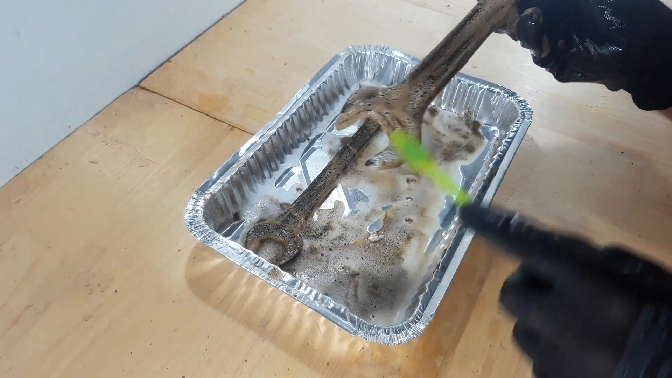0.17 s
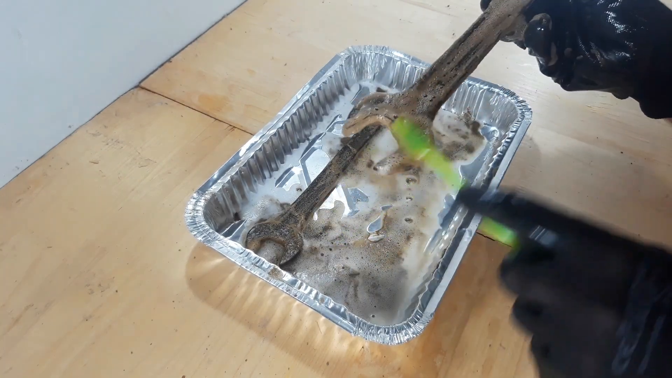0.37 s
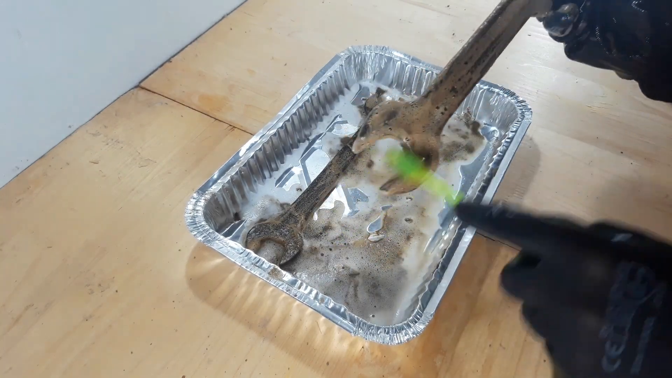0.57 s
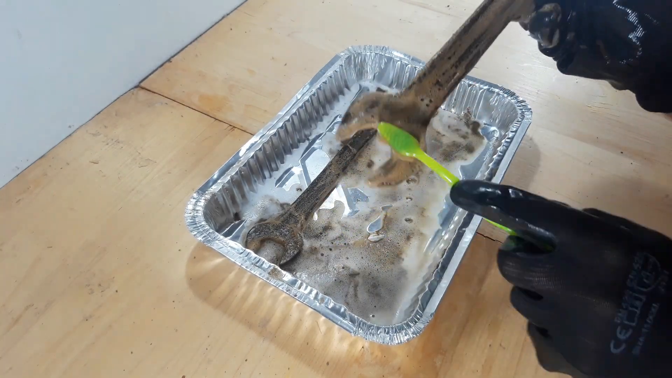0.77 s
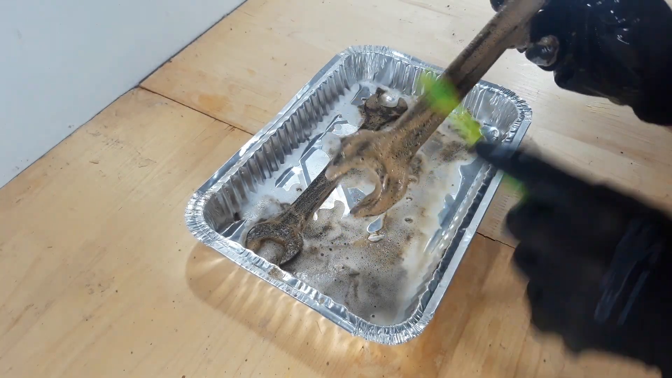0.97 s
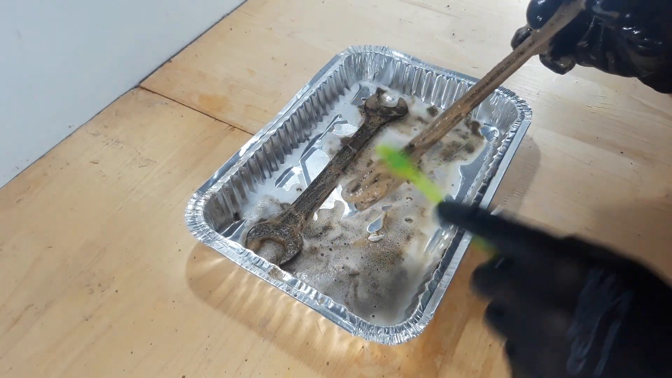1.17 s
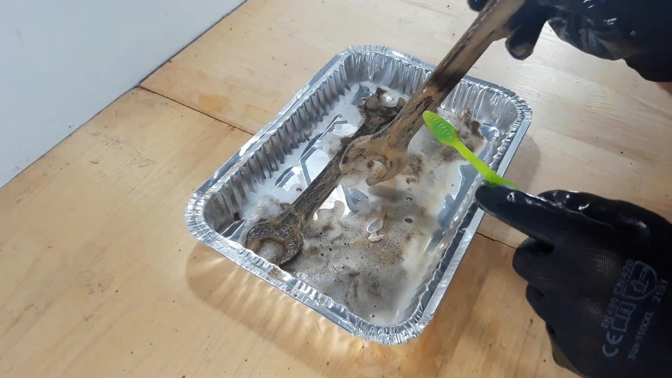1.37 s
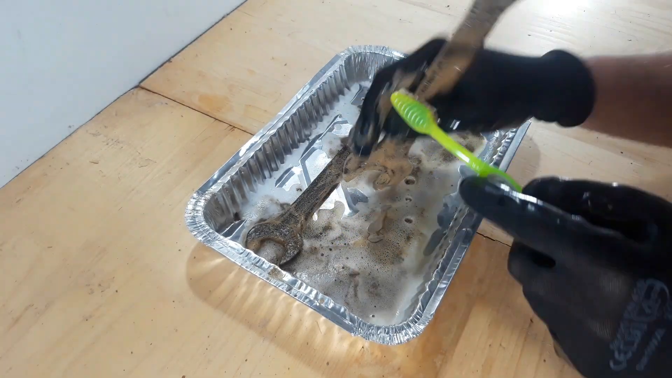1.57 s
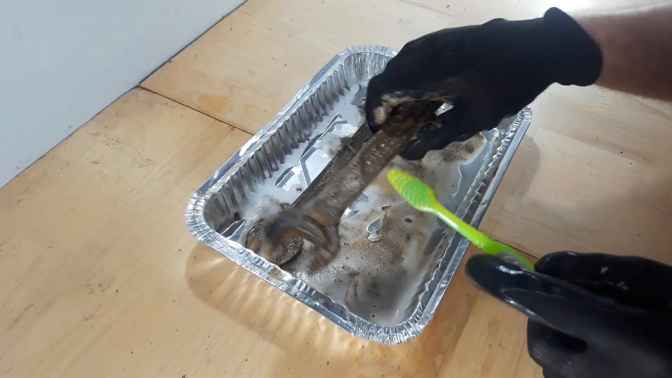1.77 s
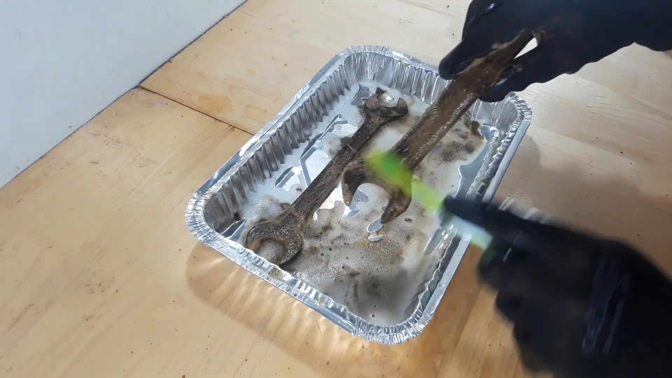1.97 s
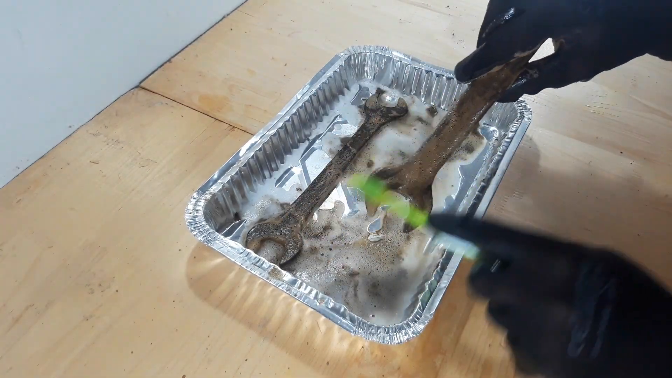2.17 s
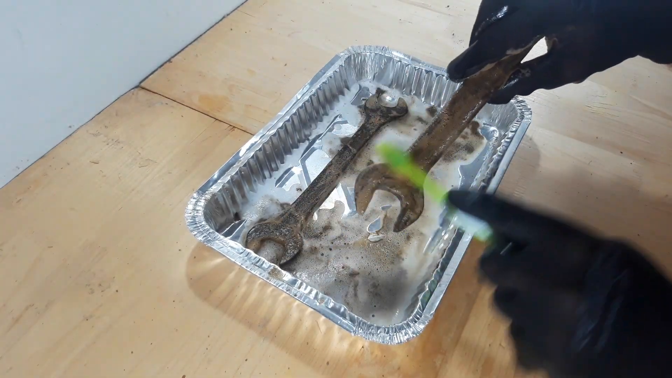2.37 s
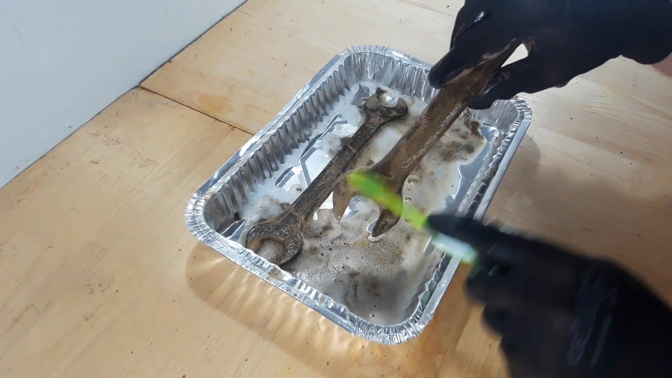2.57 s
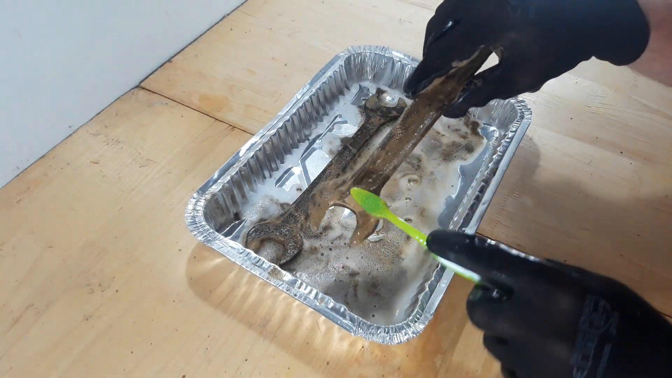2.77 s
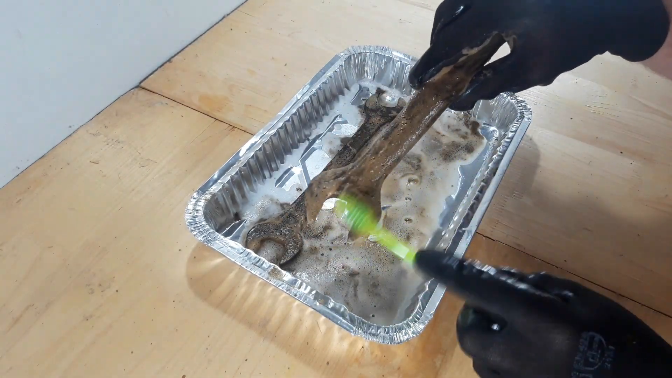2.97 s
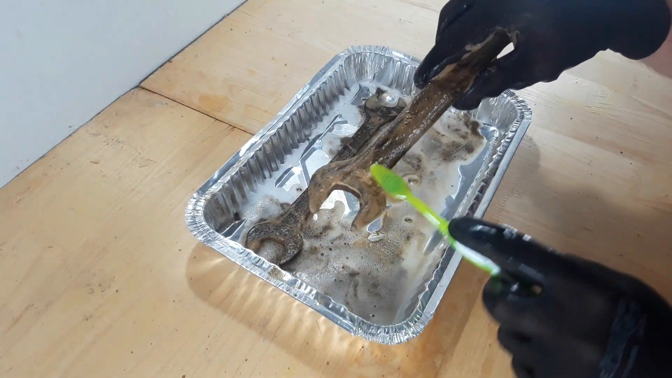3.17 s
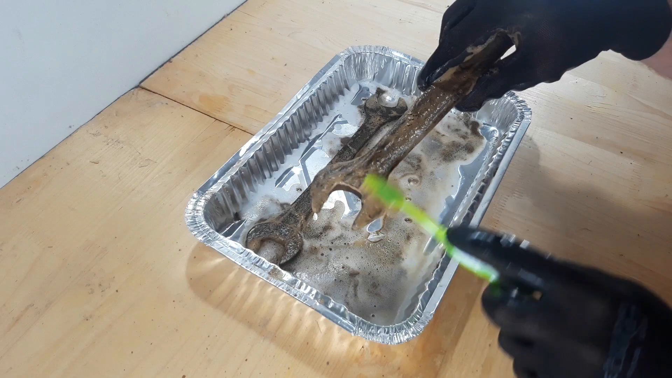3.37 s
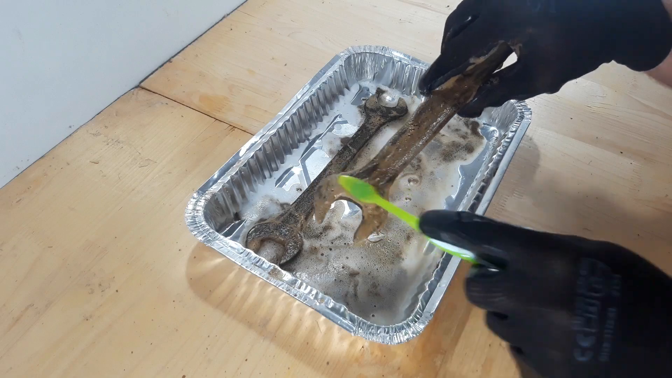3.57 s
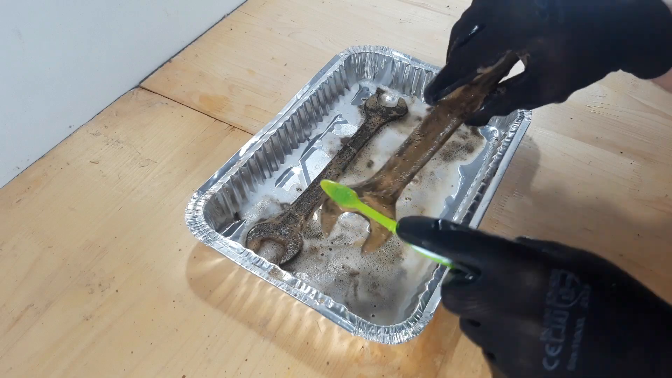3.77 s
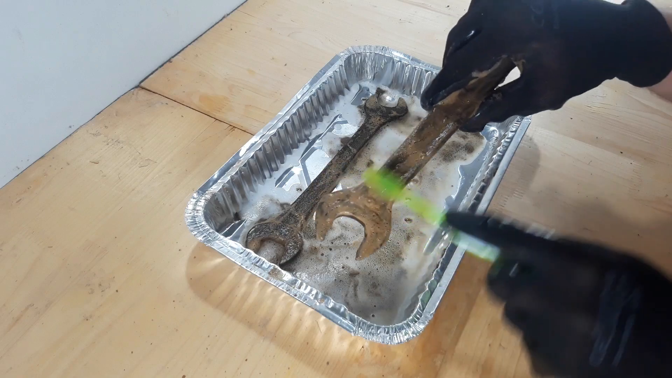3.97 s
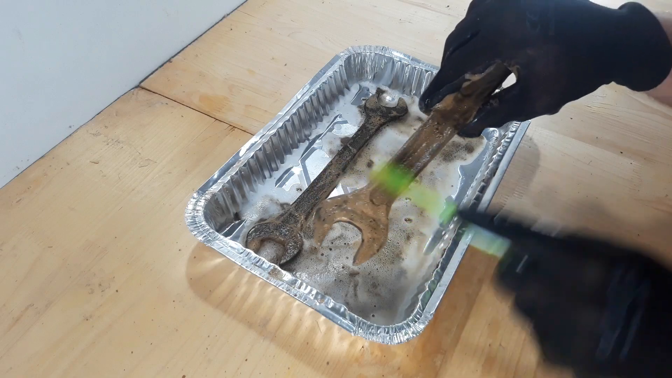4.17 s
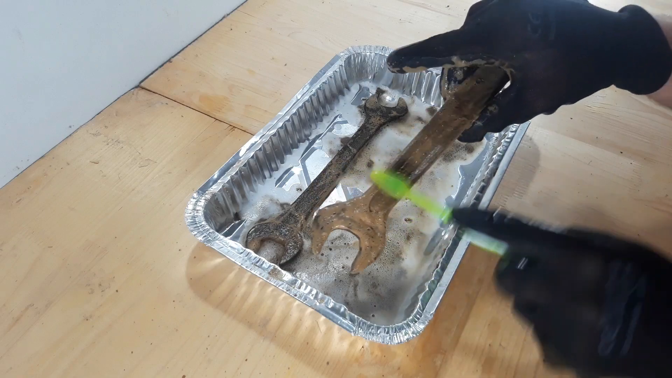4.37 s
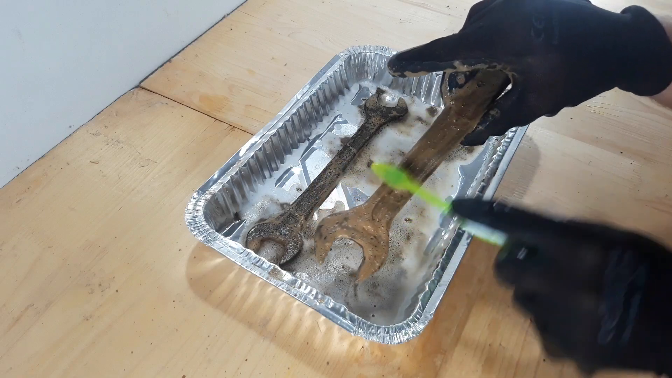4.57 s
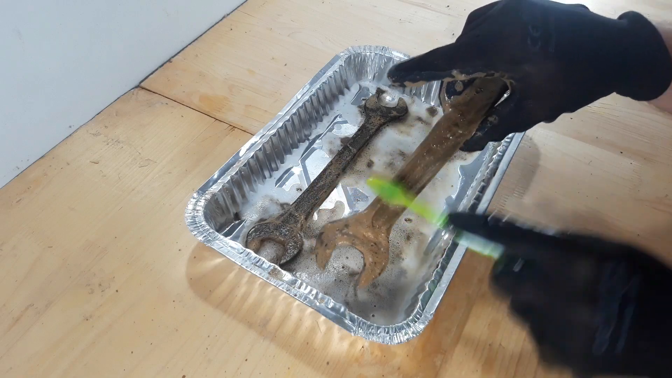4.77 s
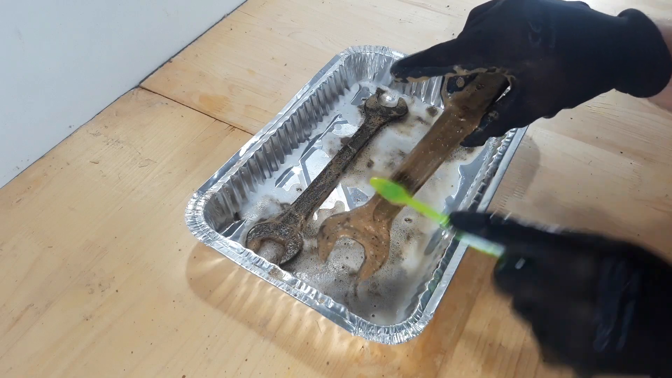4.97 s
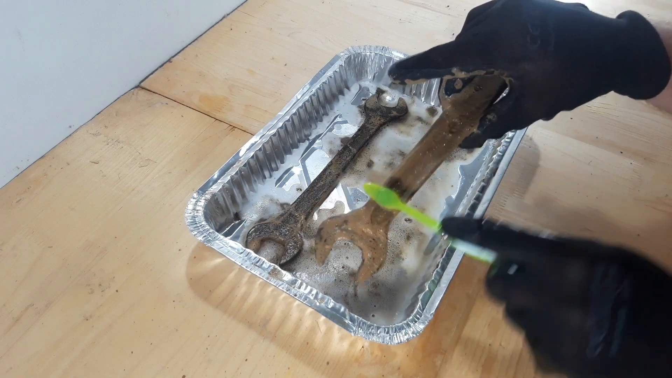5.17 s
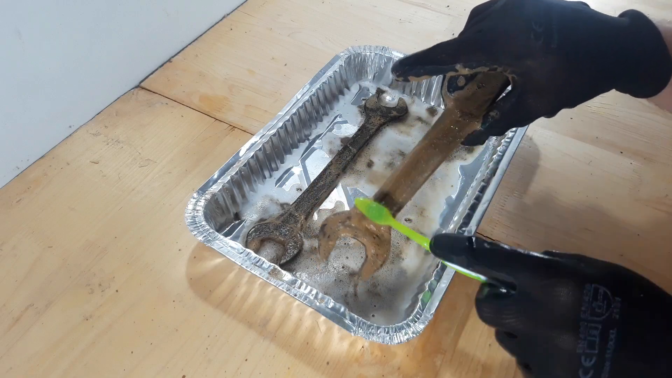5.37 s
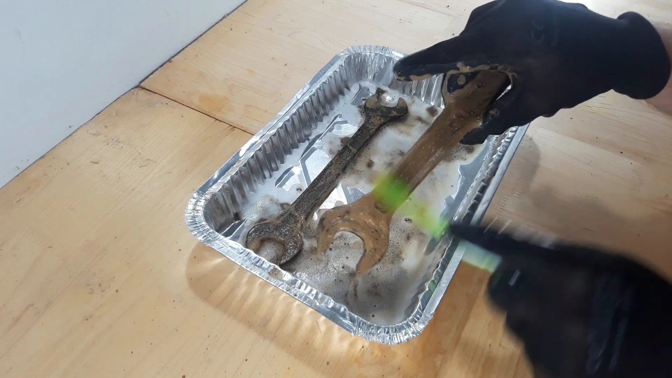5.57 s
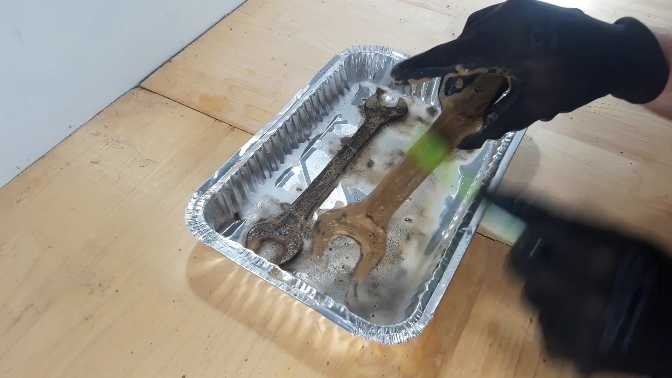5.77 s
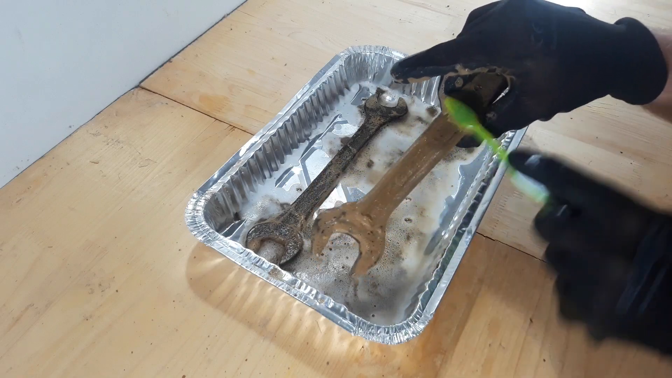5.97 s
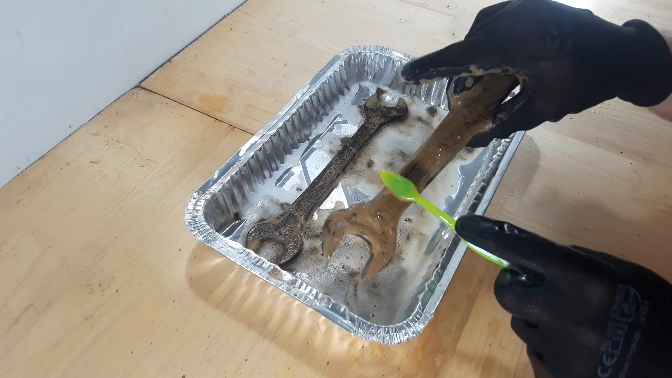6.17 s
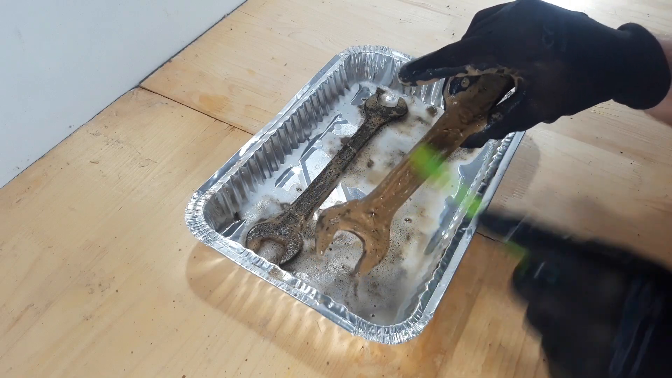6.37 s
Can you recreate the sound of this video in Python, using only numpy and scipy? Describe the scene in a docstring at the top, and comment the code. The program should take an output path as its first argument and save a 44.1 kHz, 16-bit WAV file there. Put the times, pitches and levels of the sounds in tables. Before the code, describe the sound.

Close up in a quiet, dry room, a toothbrush scrapes a rusty wrench in a foil tray of foamy liquid. Short uneven strokes, hissy and hollow, come with soft wet drag between them. Sharp steel ticks and small scrapes sound as the wrench is shifted. Then brisk, regular back-and-forth scrubbing takes over and grows louder, alternating dull and sharp strokes until the end.

```python
"""A toothbrush scrubs a rusty steel wrench in a foil tray of foamy liquid on a wooden bench, close by.
At first mostly single strokes, each a shower of bristle flicks: a wet hiss and a hollow rasp.
Meanwhile the wrench is shifted at about 0.1, 1.5 and 2.8 s, when slips and blows excite steel and foil.
From 3.6 s come brisk to-and-fro scrubs, a dull pull and a sharp push, with a few more single strokes.
Filtered noise and a wavering low tone make a quiet room underneath throughout."""
import sys
import numpy as np
from scipy import signal
from scipy.fft import rfft, irfft
from scipy.io import wavfile
from scipy.ndimage import uniform_filter1d, map_coordinates

SR = 44100
rng = np.random.default_rng(int(sys.argv[2]) if len(sys.argv) > 2 else 0)


def file_out(sig):
    """Save sig as 16-bit WAV at sys.argv[1]."""
    # one column per channel
    cols = np.atleast_2d(sig).T
    # limit, then scale
    lim = np.clip(cols, -1, 1)
    pcm = np.round(lim * 32767).astype(np.int16)
    wavfile.write(sys.argv[1], SR, pcm)


N = 283551
TIME = np.arange(N) / SR  # s
FREQS = np.fft.rfftfreq(4096, 1 / SR)  # Hz, the grid on which filters are drawn


# Spectral shape of bristle hiss and of steel ticks: (frequency [Hz], relative level [dB])
HISS_SPECTRUM = [(200, -44), (800, -32.5), (1300, -27.5), (2300, -10), (2900, -9.5), (3500, -5),
                 (5200, -2.5), (6500, -0.5), (7500, -0.5), (8600, -8.5), (9900, -23.5), (11400, -20),
                 (15800, -23.5)]
RASP_DB, RASP_DB_PER_EDGE = -11, -4.5  # hollow rasp relative to the hiss
SHARP_DB, SHARP_DB_PER_EDGE = 1.86, 2.5  # tilt of upper hiss over lower hiss
RASP_PER_HISS, USUAL_HISS_DB = 0.1, -36  # a hard stroke gains more rasp than hiss (dB per dB)


def brush():
    """Stick-slip: bristles snapping over rust hiss, and whole tufts excite the hollow resonances."""
    start, end, hiss_db, edge = strokes()
    rasp_db = RASP_DB + RASP_DB_PER_EDGE * edge + RASP_PER_HISS * (hiss_db - USUAL_HISS_DB)
    sharp_db = SHARP_DB + SHARP_DB_PER_EDGE * edge
    drag = dragging()

    # a sharp stroke lifts the upper hiss and thins the lower
    upper_stroke = contact(start, end, hiss_db + sharp_db / 3, rise=0.0059, fall=0.0011)
    lower_stroke = contact(start, end, hiss_db - 2 * sharp_db / 3, rise=0.0059, fall=0.0011)
    bristles = flicks(per_s=8000, spread_db=1.0, clump_db=1, clump_hz=170)
    grain = colour(bristles, spectrum(HISS_SPECTRUM))
    high_pass = 1 / (1 + (5400 / (np.fft.rfftfreq(N, 1 / SR) + 1)) ** 8)
    treble = irfft(rfft(grain) * high_pass, N)
    hiss = treble * np.maximum(upper_stroke, drag)
    hiss = hiss + (grain - treble) * np.maximum(lower_stroke, drag)

    # whole tufts slip less often than single bristles and sound the hollow body
    tuft_slips = flicks(per_s=2600, spread_db=1.5, clump_db=2, clump_hz=117)
    tufts = unit(0.3 * bristles + tuft_slips)
    rasp_stroke = contact(start, end, hiss_db + rasp_db, rise=0.0084, fall=0.0018)
    rasp = np.maximum(rasp_stroke, drag * amp(-12.5))
    # pressure grows from 0 to 1 as the rasp rises from -54 to -41 dB, and reaches deeper resonances
    pressure = np.clip((20 * np.log10(rasp + 1e-9) + 54) / 13, 0, 1)
    light_body = colour(tufts * rasp * (1 - pressure), hollow(low_hz=1030))
    firm_body = colour(tufts * rasp * pressure, hollow(low_hz=1005))

    rubbing = amp(0.93) * hiss + light_body + firm_body
    return shimmer(rubbing, patchy_db=2.0, patch_s=.03, patch_hz=447.7) + jaw(hiss)


# Single strokes of uneven timing: (start [s], end [s], hiss before tilt [dB], edge [-])
# edge: -1 = bristles flat, dull and hollow; +1 = on their tips, sharp and thin
SINGLE_STROKES = [(0.0, .019, -54.5, 1.3), (.194, .227, -60, -1.9), (.229, .259, -49, -0.13),
                  (.266, .31, -41.5, 0.43), (.297, .369, -45.5, .2), (.539, .595, -40.5, 0.29),
                  (.616, .669, -40.5, 1.4), (.704, .761, -51, -.6), (.808, .83, -52, 0.8),
                  (.845, .878, -37.5, 0.38), (.892, .911, -39.5, -0.81), (.944, .966, -42.5, -0.046),
                  (.978, 1.009, -41, 1), (1.015, 1.049, -48, -0.97), (1.118, 1.172, -48, -.3),
                  (1.186, 1.215, -45.5, -0.55), (1.219, 1.253, -49, 1.3), (1.494, 1.543, -47, -2.04),
                  (1.551, 1.595, -43, .1), (1.661, 1.766, -54.5, -1.63), (1.835, 1.87, -61.5, -0.51),
                  (1.88, 1.935, -70, -0.28), (1.936, 1.964, -56, 0.13), (1.974, 1.996, -39.5, -0.38),
                  (1.993, 2.031, -41, 2.1), (2.055, 2.081, -47, -0.63), (2.111, 2.15, -44, 0.023),
                  (2.151, 2.206, -38.5, 1.4), (2.225, 2.242, -42.5, -0.56), (2.273, 2.288, -43.5, 0.75),
                  (2.346, 2.374, -42, -0.44), (2.385, 2.451, -38.5, 0.27), (2.458, 2.483, -39.5, -0.78),
                  (2.502, 2.539, -45.5, 1.1), (2.549, 2.572, -40, -.1), (2.586, 2.609, -40.5, 0.17),
                  (2.622, 2.65, -38.5, -0.31), (2.654, 2.684, -40, 1.5), (2.703, 2.723, -41.5, 0.16),
                  (2.758, 2.789, -38.5, 2.1), (2.796, 2.824, -43.5, 2), (2.971, 2.996, -44.5, 0.11),
                  (3.036, 3.063, -41, 0.31), (3.139, 3.157, -49, -0.99), (3.189, 3.202, -45, 1.7),
                  (3.273, 3.283, -44, -.3), (3.375, 3.39, -39, 1.1), (3.409, 3.468, -40, 0.23),
                  (3.476, 3.511, -38.5, -0.88), (3.579, 3.608, -38, 1.9), (3.989, 4.021, -35, 0.33),
                  (6.203, 6.207, -39, 2.2), (6.22, 6.245, -62.5, -0.65), (6.281, 6.305, -71, 1.2),
                  (6.315, 6.345, -29.5, 0.59)]
# To-and-fro scrubbing: (pull start [s], push start [s], hiss of the push before tilt [dB])
SCRUB_CYCLES = [(3.647, 3.687, -40), (3.748, 3.79, -37.5), (3.853, 3.888, -34), (4.027, 4.078, -35.5),
                (4.125, 4.175, -33.5), (4.229, 4.28, -31), (4.325, 4.393, -33.5), (4.433, 4.489, -34.5),
                (4.536, 4.575, -33.5), (4.637, 4.679, -31), (4.737, 4.779, -27.5), (4.841, 4.881, -28.5),
                (4.933, 4.982, -27.5), (5.037, 5.085, -28), (5.134, 5.189, -28), (5.235, 5.289, -27.5),
                (5.343, 5.395, -26.5), (5.457, 5.498, -28.5), (5.561, 5.602, -28.5), (5.664, 5.712, -31.5),
                (5.765, 5.828, -28.5), (5.87, 5.94, -26.5), (5.978, 6.042, -26), (6.088, 6.106, -29),
                (6.366, 6.419, -28.5)]
# The pull grows firmer as scrubbing gets going, and eases at the end:
# (time [s], hiss of the pull before tilt [dB])
PULL_LEVEL = [(3.65, -47.5), (3.85, -39), (4.05, -33), (5.15, -33), (5.7, -30), (6.35, -36)]
PULL_S, PUSH_S, TURN_S = 0.033, .030, 0.0085  # longest pull, push, and least rest as the brush turns
PULL_EDGE, PUSH_EDGE = -0.8, 0.37  # the pull lays the bristles flat, the push stands them on their tips


def strokes():
    """Reciprocating motion: single strokes, and cycles of dull pull and sharp push, as rows of strokes."""
    rows = list(SINGLE_STROKES)
    for pull, push, push_db in SCRUB_CYCLES:
        pull_db = np.interp(pull, *np.transpose(PULL_LEVEL))
        pull_end = min(pull + PULL_S, push - TURN_S)
        rows.append((pull, pull_end, pull_db, PULL_EDGE))
        rows.append((push, push + PUSH_S, push_db, PUSH_EDGE))
    return np.transpose(rows)


# Mean drag between strokes: (time [s], level [dB])
DRAG_LEVEL = [(.2, -58.5), (.4, -48.5), (.5, -57), (.78, -63), (.9, -53.5), (1.9, -61.5), (2.2, -51.5),
              (2.7, -49.5), (3.05, -52), (3.6, -53.5), (4.1, -44), (4.5, -46), (5.3, -39), (6.4, -44)]
# Spells in which the bristles stay in the foam: (start [s], end [s])
FOAM_SPELLS = [(0.199, 1.255), (1.495, 1.79), (1.943, 2.77), (2.964, 3.55), (3.573, 6.175), (6.315, 6.44)]


def dragging():
    """Sliding friction: a soft, uneven wet drag while bristles stay in foam, a faint fizz once lifted."""
    start, end = np.transpose(FOAM_SPELLS)
    touching = contact(start, end, np.zeros(len(start)), rise=0.0055, fall=.011)
    unevenness = amp(2.7 * wander(rate_hz=30))
    lifted = amp(-36)
    return gain_curve(DRAG_LEVEL) * unevenness * np.maximum(touching, lifted)


def flicks(per_s, spread_db, clump_db, clump_hz):
    """Shot noise: random slips of uneven size and sign, whose strength swells in clumps."""
    size = amp(spread_db * np.clip(rng.standard_normal(N), -3, 3))
    sign = rng.choice([-1, 1], N)
    slipping = rng.random(N) < per_s / SR
    return unit(sign * size * slipping * amp(clump_db * wander(clump_hz)))


def contact(starts, ends, levels_db, rise, fall):
    """Friction envelope: the power of each contact catches quickly, holds and decays exponentially."""
    power = np.zeros(N)
    for start, end, db in zip(starts, ends, levels_db):
        power[max(int(start * SR), 0):int(end * SR)] = amp(db) ** 2
    half_window = int(rise * SR) + 1
    power = signal.oaconvolve(power, signal.windows.hann(2 * half_window + 1), "same") / half_window
    keep = np.exp(-1 / (fall * SR))
    return np.sqrt(abs(signal.lfilter([1 - keep], [1, -keep], power)))


# Hollow resonances of tray and brush head: (frequency [Hz], width [Hz], relative level [dB])
HOLLOW_MODES = [(933, 34, -9), (1300, 28, -11), (1460, 85, -6), (1792, 200, 0), (2003, 150, -0.5),
                (2564, 144, -2), (3040, 160, -7)]


def hollow(low_hz):
    """Cavity resonance: the powers of the modes add, and a steep foot weakens them below low_hz."""
    power = np.zeros(len(FREQS))
    for hz, width, db in HOLLOW_MODES:
        power += amp(db) ** 2 / (1 + (2 * (FREQS - hz) / width) ** 2)
    foot = amp(-11.0) + 1 / (1 + (low_hz / (FREQS + 1)) ** 12)
    return np.sqrt(power) * foot


def shimmer(x, patchy_db, patch_s, patch_hz):
    """Time-frequency modulation: as the brush moves over pitted steel, its colour keeps shifting."""
    hz, t, z = signal.stft(x, SR, nperseg=512)
    field = rng.standard_normal((200, 1500))
    where = np.meshgrid(hz / patch_hz, t / patch_s, indexing="ij")
    patches = map_coordinates(field, where, order=3, mode="wrap")
    return signal.istft(z * unit(amp(patchy_db * patches)), SR, nperseg=512)[1][:N]


# Singing of the jaw while the brush works on it: (time [s], level relative to the hiss [dB])
JAW_LEVEL = [(1.9, -31), (2.15, -19), (2.6, -21), (3.1, -44), (3.45, -33), (4.2, -21.5), (4.6, -29)]


def jaw(hiss):
    """Forced resonance: rubbing noise keeps the lowest mode of the held wrench ringing."""
    mode = 1 / (1 + (2 * (FREQS - 2025) / 60) ** 2)
    strength = np.sqrt(abs(uniform_filter1d(hiss ** 2, size=128)))
    drive = rng.standard_normal(N) * strength * gain_curve(JAW_LEVEL)
    return colour(drive, mode)


# Slides of the wrench in the tray: (start [s], end [s], grind level [dB],
# steel ring relative to grind [dB], tray boom relative to grind [dB], boom frequency [Hz])
WRENCH_SLIDES = [(0.053, 0.107, -53.5, -41, -24, 690), (0.1, 0.123, -49, -5.5, -8.5, 623),
                 (1.412, 1.422, -62, -18, -6, 500), (1.565, 1.596, -52, -18, -8.5, 990),
                 (2.823, 2.847, -52, 3, -10, 1090), (2.842, 2.886, -56, -4, -10, 1150),
                 (2.884, 2.893, -50.5, 1, -6, 1040), (2.906, 2.931, -77, 10, -11, 1100)]
# Spectral shape of the grind: (frequency [Hz], relative level [dB])
GRIND_SPECTRUM = [(200, -30), (600, -12), (1000, -3.5), (2200, 2), (3000, -5), (7000, -4.5), (9500, -18.5),
                  (16000, -41)]


def scrapes():
    """Stick-slip excitation: rusty steel judders over the tray, ringing itself and booming the foil."""
    start, end, grind_db, ring_db, *_ = np.transpose(WRENCH_SLIDES)
    slips = flicks(per_s=4000, spread_db=0.0, clump_db=1.7, clump_hz=170)
    grind = slips * contact(start, end, grind_db, rise=0.003, fall=0.0018)
    ringing = slips * contact(start, end, grind_db + ring_db, rise=0.003, fall=0.0018)
    squeal = amp(-7) * steel(bright_hz=8200, octaves=0.17)
    ring = steel(bright_hz=2640, octaves=0.53) + squeal
    out = colour(grind, spectrum(GRIND_SPECTRUM))
    out = out + signal.oaconvolve(ringing, ring / np.linalg.norm(ring))[:N]
    for start, end, db, _, boom_db, boom_hz in WRENCH_SLIDES:
        at = int(start * SR)
        push = amp(db + boom_db) * slips[at:max(int(end * SR), at + 1)]
        half_width = 0.54 * (1000 / boom_hz) ** 1.53  # octaves; a deep boom is also broad
        resonance = 1 / (1 + (np.log2((FREQS + 1) / boom_hz) / half_width) ** 4)
        boom = colour(push, resonance)
        out[at:at + len(boom)] += boom
    return out


# Modes of the wrench: (frequency [Hz], level [dB], t60 before the glove chokes it [s])
WRENCH_MODES = [(1983, -6, 0.22), (3550, -1.5, 0.071), (5276, -0.5, 0.077), (6800, -1, .08),
                (8210, -15, .07)]


def steel(bright_hz, octaves):
    """Modal synthesis: a blow favours modes near bright_hz; they decay and the glove chokes them."""
    t = np.arange(SR // 4) / SR
    ring = np.zeros(len(t))
    for hz, db, t60 in WRENCH_MODES:
        favour = np.exp(-(np.log2(hz / bright_hz) / octaves) ** 2)
        ring += amp(db - 60 * t / t60) * favour * np.sin(2 * np.pi * hz * t)
    choke = amp(-21) + 1 / (1 + (t / 0.0064) ** 8)
    return choke * ring


# Steel knocks: (time [s], tick level [dB], ring level [dB], favoured frequency [Hz])
STEEL_KNOCKS = [(.1132, -23, -49, 6500), (.1170, -28, -42, 5970), (1.419, -57, -58, 2600),
                (1.5950, -20, -59, 6500), (1.865, -33, -63, 4500), (2.662, -32, -47, 6500),
                (2.829, -42, -38.5, 2000), (2.886, -41, -42.5, 3470)]


def knocks():
    """Impulse response: each blow gives a sharp tick and a ring that the gloved hand soon damps."""
    ticks, rings = np.zeros(N), np.zeros(N)
    for s, tick_db, ring_db, bright_hz in STEEL_KNOCKS:
        at = int(s * SR)
        ring = steel(bright_hz, octaves=0.41)
        ticks[at] = amp(tick_db)
        rings[at:at + len(ring)] += amp(ring_db) * ring
    return colour(ticks, spectrum(HISS_SPECTRUM)) + rings


def reflections(x, t60):
    """Diffuse reverberation: bench, tray and wall scatter sparse echoes that decay exponentially."""
    t = np.arange(SR // 4) / SR
    echoes = rng.standard_normal(len(t)) * (rng.random(len(t)) < 2500 / SR)
    taps = echoes * amp(-60 * t / t60) * (t > .002)
    return signal.oaconvolve(x, taps / np.linalg.norm(taps))[:N]


# Spectral shape of the still air: (frequency [Hz], relative level [dB])
AIR_SPECTRUM = [(20, -10), (50, -1), (100, 2.5), (135, 2.5), (200, -7), (300, -9.5), (700, -12),
                (2000, -18.5), (7000, -15), (10000, -23), (16000, -23.5)]
# A low hum that swells and fades: (time [s], peak level [dB])
HUM_LEVEL = [(1.3, -90), (1.68, -67), (2.05, -82), (3.42, -76), (3.8, -84), (4.2, -77), (5.4, -89),
             (5.89, -67), (6.2, -87)]


def room():
    """Background noise: filtered white noise for still air, and a frequency-modulated sine as hum."""
    air = amp(-72.5) * colour(rng.standard_normal(N), spectrum(AIR_SPECTRUM))
    hum_hz = 131 + 13 * wander(rate_hz=26.3)
    hum = gain_curve(HUM_LEVEL) * np.sin(2 * np.pi * np.cumsum(hum_hz) / SR)
    return air + hum


def amp(db):
    """Logarithmic level: decibels to amplitude gain."""
    return 10 ** (np.asarray(db) / 20)


def unit(x):
    """Root mean square: scales to an rms of one."""
    return x / np.sqrt(np.mean(x ** 2) + 1e-20)


def gain_curve(points):
    """Level automation: gain at every moment, linear in decibels between (time, dB) points."""
    return amp(np.interp(TIME, *np.transpose(points)))


def spectrum(points):
    """Frequency response: gain on a logarithmic frequency axis from (Hz, dB) points."""
    hz, db = np.transpose(points)
    return amp(np.interp(np.log(FREQS + 1), np.log(hz), db))


def colour(x, gain, keep_power=True):
    """Minimum-phase filtering: causal, with the given gain; by default white noise keeps its power."""
    log_gain = np.log(np.maximum(np.r_[gain, gain[-2:0:-1]], 1e-5))
    # the Hilbert transform of the log gain supplies the phase
    response = np.exp(np.conj(signal.hilbert(log_gain)))[:len(gain)]
    taps = irfft(response)
    if keep_power:
        taps = taps / np.linalg.norm(taps)
    return signal.oaconvolve(x, taps)[:N]


def wander(rate_hz):
    """Low-pass noise: smooth random motion of rms one, up to about the given rate."""
    smooth = signal.butter(2, rate_hz, fs=SR, output="sos")
    return unit(signal.sosfilt(smooth, rng.standard_normal(N)))


# Part of the sound that reaches the two ports with opposite sign: (frequency [Hz], relative level [dB])
UNALIKE_SHARE = [(150, -18), (600, -29), (2000, -17), (5000, -13), (13000, -9)]
# Lag of the left port behind the right: (frequency [Hz], phase [radians])
PORT_LAG = [(0, 0), (2330, .25), (15600, 2.15)]


def scene():
    """Phase difference: all sound reaches two close microphone ports, the left a hair later."""
    near = brush() + scrapes() + knocks()
    both = near + amp(-14.5) * reflections(near, t60=0.065) + room()
    # random phases make a scattered part that the ports receive with opposite sign
    hz, _, z = signal.stft(both, SR, nperseg=256)
    share = np.interp(hz, FREQS, spectrum(UNALIKE_SHARE))[:, None]
    scatter = share * np.exp(2j * np.pi * rng.random(z.shape))
    apart = signal.istft(z * scatter, SR, nperseg=256)[1][:N]
    lag = np.interp(np.fft.rfftfreq(N, 1 / SR), *np.transpose(PORT_LAG))
    left = irfft(rfft(both + apart) * np.exp(-1j * lag), N)
    right = both - apart
    return np.array([left, right])


def record(dry):
    """Band limiting: a linear-phase low-pass removes what lies above the recorder's edge."""
    taps = signal.firwin(511, 15900, window=("kaiser", 9), fs=SR)  # edge in Hz
    return signal.oaconvolve(dry, taps[None], "same", axes=1)


dry = scene()
out = record(dry)
file_out(out)
```